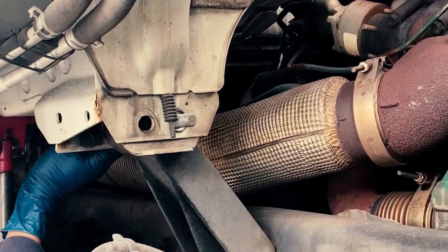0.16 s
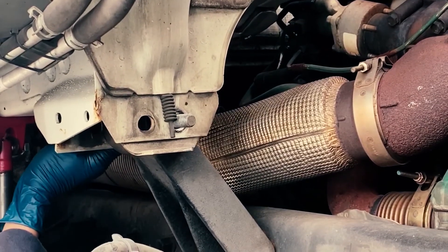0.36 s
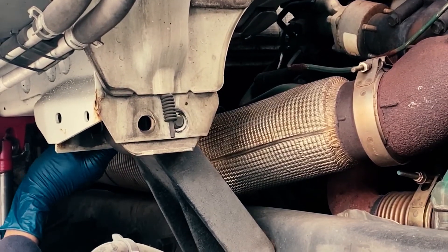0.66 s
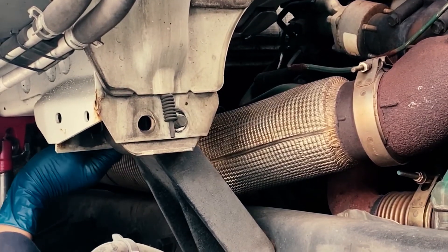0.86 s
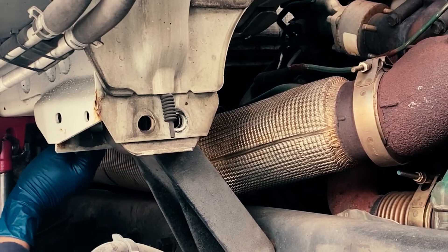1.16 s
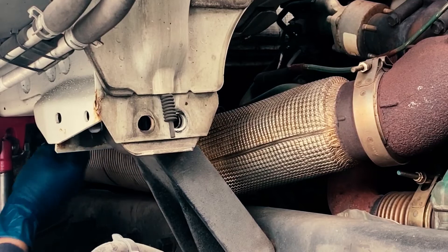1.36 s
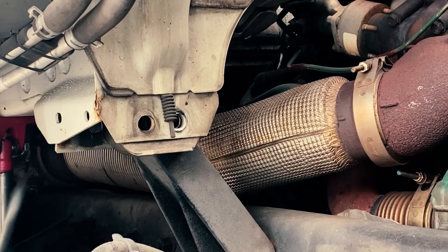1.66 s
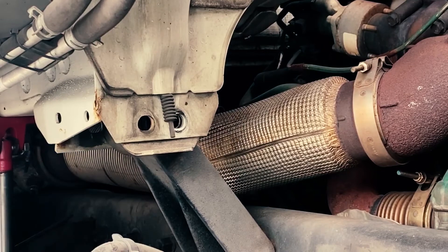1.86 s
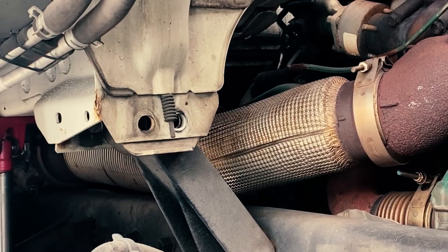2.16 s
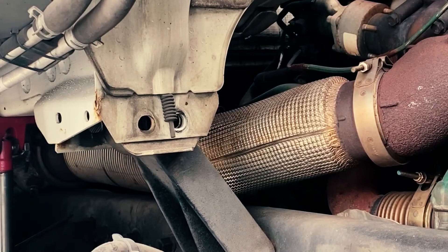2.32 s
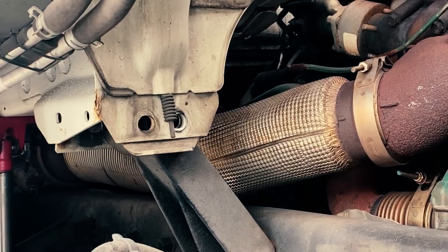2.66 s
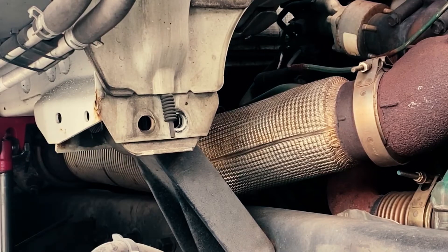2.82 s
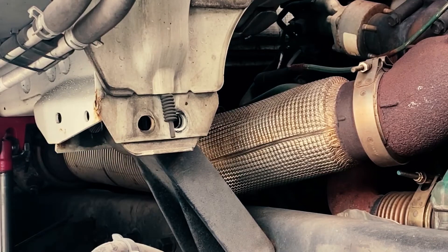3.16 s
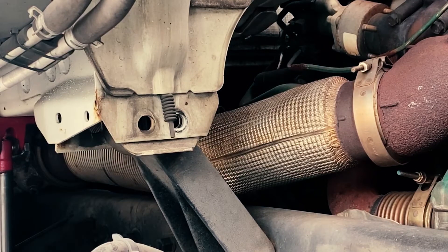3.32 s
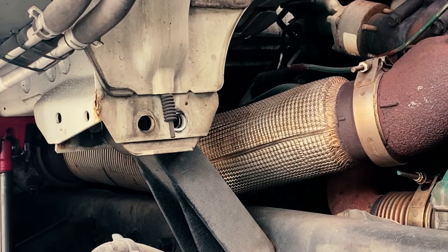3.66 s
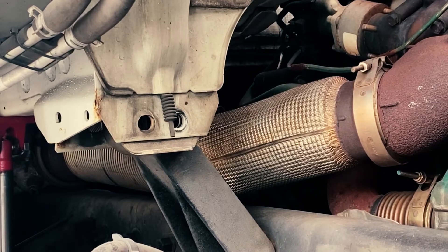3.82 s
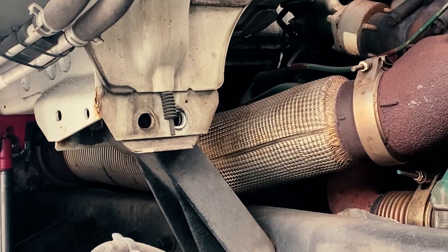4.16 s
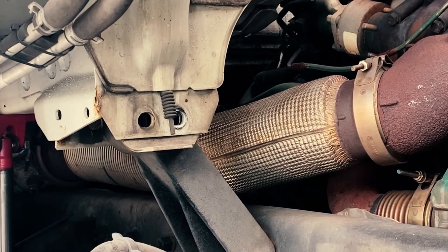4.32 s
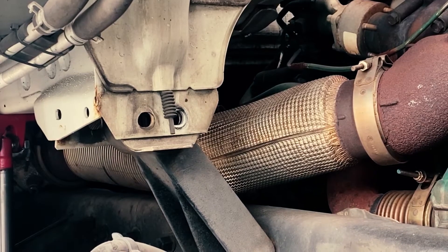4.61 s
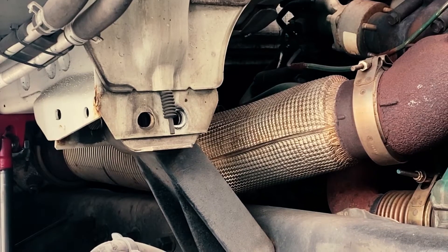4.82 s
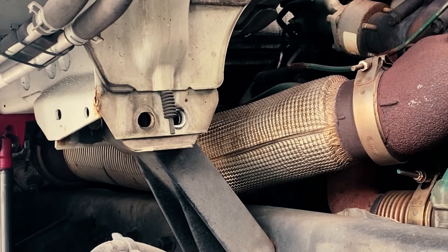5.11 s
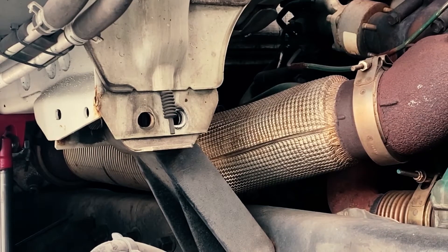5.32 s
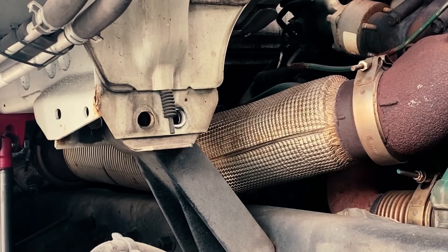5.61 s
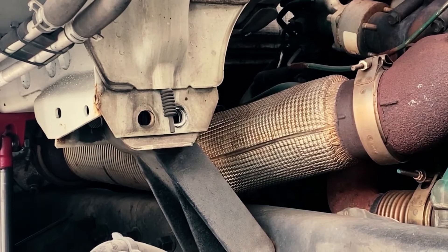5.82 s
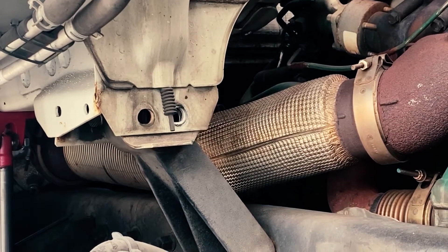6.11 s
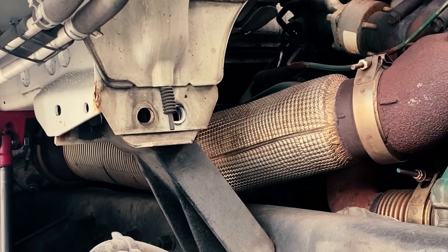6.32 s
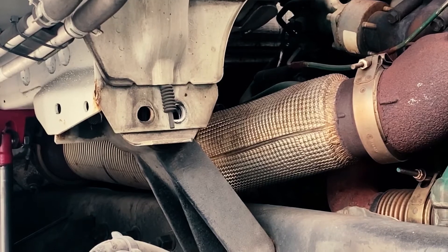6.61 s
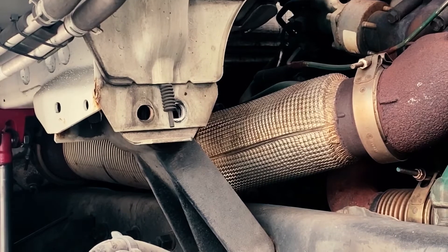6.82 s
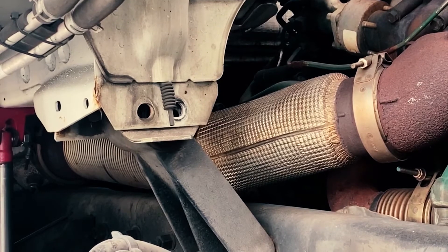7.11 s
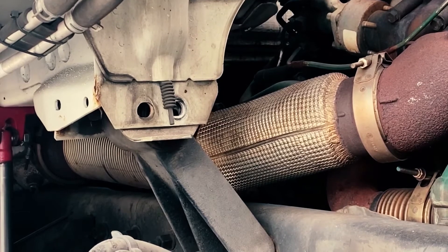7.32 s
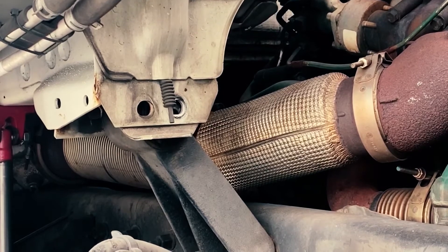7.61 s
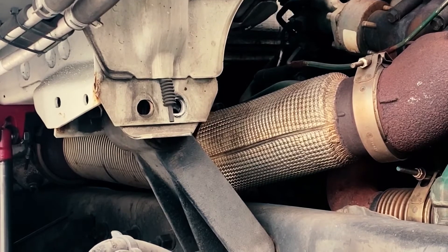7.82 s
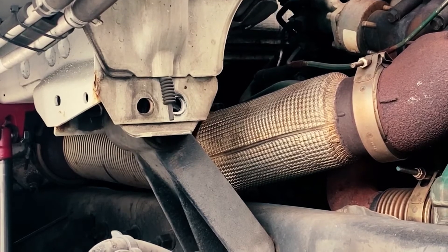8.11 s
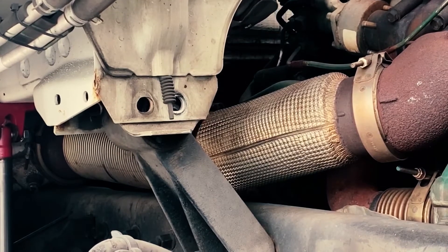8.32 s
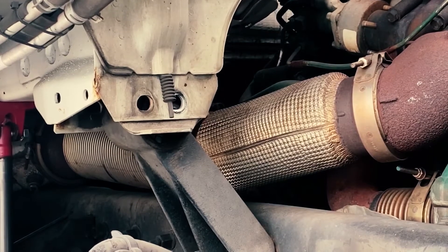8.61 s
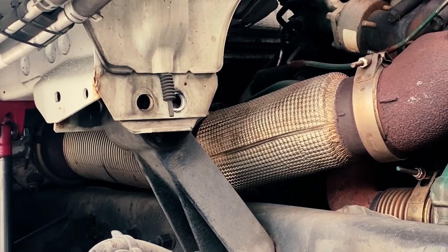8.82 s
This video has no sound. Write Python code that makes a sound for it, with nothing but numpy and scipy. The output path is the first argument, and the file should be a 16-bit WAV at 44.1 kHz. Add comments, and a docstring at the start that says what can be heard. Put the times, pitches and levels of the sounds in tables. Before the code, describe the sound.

In a workshop, steel parts knock and slide, then an air pump hammers briefly, pauses, and pulses steadily about ten times a second.

```python
"""An air-driven hydraulic pump presses a bushing into a bracket under a truck in a workshop.
Each stroke thumps and clatters the pump body (modes, noise bursts) and blows a puff of noise through the
muffler's resonances, about ten a second, slowing under load; feed air hisses in between.
In the first pause a hand slides and clinks steel adapters on the press: noisy slips and ringing modes.
A fan hums throughout as wavering tones in a wash of noise; a thin squeak and a faint high hiss come and go."""
import sys
import numpy as np
from scipy import signal
from scipy.fft import rfft, irfft
from scipy.io import wavfile
from scipy.ndimage import uniform_filter1d

SR = 44100
rng = np.random.default_rng(int(sys.argv[2]) if len(sys.argv) > 2 else 0)


def master(y):
    """Save y as 16-bit WAV."""
    cut = np.clip(np.atleast_2d(y).T, -1, 1)
    pcm = np.round(cut * 32767)  # scale
    wavfile.write(sys.argv[1], SR, pcm.astype(np.int16))


N = 395577
HZ, TIME = np.fft.rfftfreq(N, 1 / SR), np.arange(N) / SR

# The fan's humming tones. Each row: frequency in Hz, level in dB rms.
FAN_TONES = [(43.1, -45), (75.4, -43.5), (123.8, -57.5), (274.5, -63), (882.9, -69.5), (1007, -76),
             (1071, -71.5), (1098, -80)]
# Colour of the fan's wash of air. Each row: frequency in Hz, relative level in dB per Hz.
FAN_WASH = [(25, -34.5), (45, 7.5), (70, 2), (130, -2), (200, -8.5), (310, -11.5), (500, -23), (950, -23.5),
            (1300, -32), (3000, -39), (7000, -55), (13000, -71.5)]
FAN_WASH_DB = -45
# Colour of the sound sent to the reflections. Each row: frequency in Hz, gain in dB.
REFLECTED = [(100, -15.5), (300, 7.0), (1100, 11), (2400, 2), (5000, -1.5), (8900, -23), (12000, -11.5)]
# Phase between the two microphone ports. Each row: frequency in Hz, left minus right in radians.
PORT_PHASE = [(0, 0), (4400, -.1), (5700, -.85), (6900, -.3), (7400, 1.9), (8900, 3.1), (11900, 6.2),
              (12900, 6.4), (15500, 9.5)]
# Balance of the direct sound. Each row: frequency in Hz, left minus right in dB.
PORT_BALANCE = [(60, -2.5), (150, -0.5), (380, 1.5), (950, -1.5), (2380, 2), (5980, -0.5), (15000, -0.5)]
BAND_EDGE_HZ = 15800

# Colour of a faint high hiss. Each row: frequency in Hz, relative level in dB per Hz.
HISS_COLOUR = [(3000, -15), (6000, -3), (9000, -20), (11000, 2), (13000, -0.5), (15500, -11)]
# Its fade. Each row: time in seconds, level in dB.
HISS_FADE = [(0, -80), (3.4, -76), (4.7, -78.5), (5.1, -105)]
# Path of a faint falling squeak. Each row: time in seconds, pitch in Hz, level in dB.
SQUEAK_PATH = [(2.41, 4470, -71), (2.44, 4150, -62), (2.49, 3970, -80), (2.52, 3900, -96)]

# Steel modes. Each row: frequency in Hz, relative level in dB, free ring (t60) in seconds.
SLEEVE_MODES = [(2295, 0.5, 0.82), (5900, 5.5, 0.9), (10930, -8, 1.7)]
WASHER_MODES = [(11900, -4.5, 0.24), (12220, 5, 0.4), (14550, -12, 0.31)]
BRACKET_MODES = [(283, -2, 0.2), (526, -1.5, 0.11), (576, -3, 0.096), (840, -6, 0.1), (1107, -9, .07),
                 (1628, -11.5, 0.051), (1830, -15, .08), (2270, -8, 0.11), (2860, -9.5, 0.051)]
# Colours of rubbing steel, low (also a knock's thud) and high, and of a tick.
# Each row: frequency in Hz, relative level in dB per Hz.
LOW_RUB_COLOUR = [(120, -12), (280, -6), (520, 1), (900, -3), (1300, -19.5), (2000, -27.5), (5000, -39.5)]
HIGH_RUB_COLOUR = [(700, -33), (1400, 8), (1900, 3.5), (2500, 0.5), (3100, 1.5), (3800, -16.5), (4600, -17),
                   (7000, -28.5), (14000, -46.5)]
TICK_COLOUR = [(200, -29.5), (1000, 2.5), (3000, -6), (5000, 2), (8000, -4.5), (14000, -8)]
# Resonances that rubbing brings out in the press, and those that colour a light tick.
# Each row: centre in Hz, width in Hz, peak level in dB.
RUB_RESONANCES = [(1060, 90, 2.5), (1840, 110, 13.5), (3180, 110, 1)]
TICK_RESONANCES = [(3200, 100, 12), (4700, 120, 12), (5870, 112, 8)]
# Scrapes of the adapters on the press.
# Each row: start in seconds, length in seconds, relative level in dB, treble relative to it in dB.
SCRAPE_EVENTS = [(0.41, 0.19, -50, -8), (0.595, 0.26, -60, -21), (0.783, .04, -43.5, -12.5),
                 (0.887, .012, -38.5, -4), (0.925, .045, -34.5, -9.5), (0.991, 0.08, -37, -3.5),
                 (1.202, 0.078, -36.5, 1.5), (1.265, 0.073, -44, 4.5), (2.899, 0.011, -47, 8),
                 (2.928, 0.031, -45.5, -20)]
# A scrape swells over this share of its length, holds, then dies away (t60 in seconds).
SWELL_SHARE, SCRAPE_T60 = 0.5, 0.12
# Light ticks of steel settling. Each row: time in seconds, level in dB.
LIGHT_TICKS = [(.433, -53), (.533, -59), (.651, -55), (1.547, -55), (1.668, -51.5), (2.312, -58),
               (3.037, -55), (3.39, -56.5), (3.59, -57)]
# Adapters knocking on the bracket.
# Each row: time in seconds, then relative levels in dB of the knock, the tick and the sleeve's ring.
BRACKET_KNOCKS = [(.265, -51.5, -59.5, -76), (.295, -43, -71, -85), (.363, -42, -71.5, -82),
                  (.897, -30, -58, -64), (.951, -34.5, -53, -60), (1.021, -44, -55, -58),
                  (1.229, -44, -56, -59), (1.248, -41, -55, -43), (1.342, -34.5, -49, -54),
                  (2.835, -28.5, -42, -57), (2.89, -33.5, -51, -46), (2.904, -30, -65, -55)]
# The hand's grip cuts a knock's ring short: time it lets go in seconds, ring length as a factor
# while held, and the same once seated on the press.
LET_GO_S, HELD_RING, SEATED_RING = 1.5, 0.091, 0.17
# The washer clinking on the sleeve.
# Each row: time in seconds, washer level in dB, sleeve level in dB, ring length as a factor.
WASHER_CLINKS = [(.826, -31, -59.5, .3), (.886, -17, -37, 0.09), (2.997, -53, -60, 0.68)]

# Presses of the pedal.
# Each row: pedal down in seconds, first stroke in seconds, pedal up in seconds, starting strokes per second.
PEDAL_PRESSES = [(-0.1, -0.018, 0.105, 10.42), (3.727, 3.8045, 4.42, 10.72), (5.553, 5.641, 9.1, 10.52)]
# As oil pressure builds, the pump settles to a slower pace: strokes per second, time constant in seconds.
LOADED_RATE, LOADING_S = 9.784, 1.576
# A stroke's exhaust under full load, its gain per extra stroke a second, and its random scatter, in dB.
STROKE_DB, DB_PER_RATE, SCATTER_DB = -19.5, 1.1, 0.38
# The first stroke has the full line pressure; the last is starved as the valve closes (dB).
FIRST_DB, LAST_DB = 1.5, -1.5
# Feed air with the pedal down, as the valve cracks open, and the valve's knock, in dB.
FEED_DB, CRACK_DB, PEDAL_DB = -39.5, -46.5, -49
# With the pedal up the hiss shuts off quickly, then the hose bleeds down faintly.
SHUT_DB_PER_S, BLEED_DB, BLEED_DB_PER_S = 339, -69.5, 23.5
# Blows of piston and valve within a stroke. Each row: seconds after the valve opens, relative level in dB.
STROKE_BLOWS = [(-.0064, -10), (.0059, 1.5), (0.0168, 0.5), (0.0318, -3)]
# Pump body modes. Each row: frequency in Hz, relative level in dB, t60 in seconds.
BODY_MODES = [(65.9, 1.5, .46), (102.5, 3.5, 0.091), (156.3, 2, 0.22), (212.3, 1.5, 0.17),
              (263, -19.5, 0.44), (288.4, -12.5, 0.16), (440, -7, 0.27)]
# Shape of one exhaust puff. Each row: seconds after the valve opens, relative level in dB.
PUFF_SHAPE = [(-.002, -12.5), (.002, -2), (0.017, 0), (0.034, -3), (0.052, -12.5), (0.064, -20.5),
              (.11, -65.5)]
# Resonances of the muffler, and whistles of the feed valve.
# Each row: centre in Hz, width in Hz, peak level in dB.
MUFFLER_RESONANCES = [(1695, 100, -16), (1802, 35, -17.5), (2280, 80, -1.5), (2465, 62, 2),
                      (2738, 63, -4.5), (2910, 72, -9), (3075, 76, -5), (3377, 60, -11), (3764, 38, -12),
                      (4800, 56, -14), (5350, 73, -11), (5500, 48, -13)]
VALVE_WHISTLES = [(2960, 150, 10), (5150, 91, 6)]
# Colours of the piston's clatter, the exhaust jet and the feed air.
# Each row: frequency in Hz, relative level in dB per Hz.
CLATTER_COLOUR = [(200, -17.5), (400, -6.5), (750, -5.5), (1200, 0), (1800, -4.5), (3000, -6.5),
                  (4000, -16.5), (8000, -56.5)]
JET_COLOUR = [(150, -33.5), (400, -28), (900, -21), (1400, -23), (1800, -13), (2700, -14.5), (3600, -16),
              (4300, -16.5), (5400, -12.5), (7500, -18), (10000, -17), (15500, -15)]
FEED_COLOUR = [(200, 11), (1000, -4), (2300, -2.5), (3000, -7), (4100, -11.5), (5000, -6), (6000, -4),
               (15000, -4)]


def amp(db):
    """Decibels to gain."""
    return 10 ** (np.asarray(db) / 20)


def evened(x):
    """Scales to rms 1."""
    return x / np.sqrt(np.mean(x ** 2) + 1e-20)


def read(points, hz):
    """Reads a spectrum on a log-frequency axis."""
    f, value = np.transpose(points)
    return np.interp(np.log(hz + 1), np.log(f), value)


def add(mix, s, sound):
    """Mixes a sound in at time s, which may lie before the start."""
    start = round(s * SR)
    sound = sound[max(-start, 0):]
    part = mix[max(start, 0):][:len(sound)]
    part += sound[:len(part)]


def coloured(x, spectrum, peaks=(), size=8192):
    """Causal filter of unit energy: a smooth spectrum plus ringing resonances."""
    hz = abs(np.fft.fftfreq(size, 1 / SR))
    power = amp(read(spectrum, hz)) ** 2
    for centre, width, db in peaks:
        power = power + amp(db) ** 2 / (1 + ((hz - centre) / width * np.sqrt(2)) ** 2) ** 2
    # minimum phase, so that energy arrives as early as it can
    response = np.exp(np.conj(signal.hilbert(np.log(power) / 2)))
    taps = np.fft.ifft(response).real[:size // 2]
    return signal.oaconvolve(x, taps / np.linalg.norm(taps))[:len(x)]


def ring(modes, length=1, contact_s=0.0018):
    """One second of a struck object's dying modes, built up over the time of contact."""
    t = TIME[:SR]
    swing = np.zeros(SR)
    for hz, db, t60 in modes:
        decay = amp(db - 60 * t / max(t60 * length, .005))
        swing += decay * np.sin(2 * np.pi * hz * t)
    return swing * (1 - np.exp(-t / contact_s))


def burst(t60):
    """A short dying burst of noise."""
    t = TIME[:SR // 4]
    return rng.standard_normal(len(t)) * amp(-60 * t / t60)


def workshop(x, near_db=-12, near_t60=0.099, hall_db=-33, hall_t60=0.85):
    """Dense reflections from the chassis and a faint hall tail, different at each ear."""
    t = TIME[:SR]
    tails = np.zeros((2, SR))
    for db, t60 in [(near_db, near_t60), (hall_db, hall_t60)]:
        taps = rng.standard_normal((2, SR)) * amp(-60 * t / t60) * (t > .002)
        tails += amp(db) * taps / np.linalg.norm(taps, axis=1, keepdims=True)
    send = irfft(rfft(x) * amp(read(REFLECTED, HZ)), N)
    return signal.fftconvolve(send[None], tails, axes=1)[:, :N]


def fan_wash():
    """Rushing air: noise shaped by the wash spectrum, at rms 1."""
    return evened(irfft(rfft(rng.standard_normal(N)) * amp(read(FAN_WASH, HZ)), N))


def fan(waver_hz=0.42, side_db=-6):
    """Slightly wavering tones in a wash of air whose bass is alike in both ears."""
    knots = np.arange(0, 10, 1 / 6)  # six random pitch targets a second
    hum = np.zeros(N)
    for hz, db in FAN_TONES:
        waver = waver_hz * np.sqrt(hz / FAN_TONES[0][0])  # higher tones waver wider
        drift = waver * np.interp(TIME, knots, rng.standard_normal(len(knots)))
        hum += amp(db) * np.sqrt(2) * np.sin(2 * np.pi * np.cumsum(hz + drift) / SR)
    mid, side = fan_wash(), fan_wash()
    side = amp(side_db) * irfft(rfft(side) * HZ / (HZ + 300), N)  # thin the bass of the difference
    return hum + amp(FAN_WASH_DB) * np.array([mid + side, mid - side])


def hiss():
    """Coloured noise, a faint high hiss that fades away in the second pause."""
    level_db = np.interp(TIME, *np.transpose(HISS_FADE))
    return coloured(rng.standard_normal(N), HISS_COLOUR) * amp(level_db)


def squeak(rough_hz=120):
    """One thin, unsteady tone sliding down."""
    s, hz, db = np.transpose(SQUEAK_PATH)
    roughness = rough_hz * evened(uniform_filter1d(rng.standard_normal(N), size=60))
    pitch = np.interp(TIME, s, hz) + roughness
    level_db = np.interp(TIME, s, db, left=-140, right=-140)
    return amp(level_db) * np.sin(2 * np.pi * np.cumsum(pitch) / SR)


def contacts(tick_t60=0.11, knock_db=-8, thud_db=-5, thud_t60=0.056, clink_tick_db=-28, swell_s=0.0052):
    """Steel meets steel: light ticks, knocks that ring bracket and sleeve, and clinks of the washer."""
    light, ticks, thuds, rings = np.zeros((4, N))
    for s, db in LIGHT_TICKS:
        add(light, s, amp(db) * burst(tick_t60))
    for s, bracket_db, tick_db, sleeve_db in BRACKET_KNOCKS:
        length = HELD_RING if s < LET_GO_S else SEATED_RING
        add(ticks, s, amp(tick_db) * burst(tick_t60))
        add(thuds, s, amp(bracket_db + thud_db) * burst(thud_t60))  # the frame's many dense modes
        add(rings, s, amp(bracket_db + knock_db) * ring(BRACKET_MODES))
        add(rings, s, amp(sleeve_db) * ring(SLEEVE_MODES, length))
    for s, washer_db, sleeve_db, length in WASHER_CLINKS:
        add(ticks, s, amp(washer_db + clink_tick_db) * burst(tick_t60))
        add(rings, s, amp(washer_db) * ring(WASHER_MODES, length))
        add(rings, s, amp(sleeve_db) * ring(SLEEVE_MODES, length, swell_s))  # the sleeve answers more slowly
    light = coloured(light, TICK_COLOUR, TICK_RESONANCES)
    return light + coloured(ticks, TICK_COLOUR) + coloured(thuds, LOW_RUB_COLOUR) + rings


def sliding(low_db=-2, high_db=-1, sleeve_db=-51, slips_per_s=4000, spread_db=3):
    """Tiny slips of steel over steel rub the bracket and faintly ring the hand-damped sleeve."""
    low, high = np.zeros((2, N))
    t = TIME[:SR]
    for s, length, db, treble_db in SCRAPE_EVENTS:
        swell = np.minimum(t / (SWELL_SHARE * length), 1) ** 2
        push = swell * amp(db - 60 * np.maximum(t - length, 0) / SCRAPE_T60)
        add(low, s, push)
        add(high, s, amp(treble_db) * push)
    sizes = amp(spread_db * np.minimum(rng.exponential(1, N), 4)) * rng.standard_normal(N)
    slips = evened(sizes * (rng.random(N) < slips_per_s / SR))
    low_rub = coloured(slips * low, LOW_RUB_COLOUR)
    high_rub = coloured(slips * high, HIGH_RUB_COLOUR, RUB_RESONANCES)
    sleeve = signal.oaconvolve(slips * high, ring(SLEEVE_MODES, length=0.077))[:N]
    return amp(low_db) * low_rub + amp(high_db) * high_rub + amp(sleeve_db) * sleeve


def strokes():
    """Rows of (s, exhaust dB): the pump cycles while the pedal is down, slower and softer as load builds."""
    rows = []
    for _, first, up, start_rate in PEDAL_PRESSES:
        s = first
        while s < up:
            rate = LOADED_RATE + (start_rate - LOADED_RATE) * np.exp((first - s) / LOADING_S)
            accent_db = FIRST_DB * (s == first) + LAST_DB * (s + 1 / rate >= up)
            rows.append((s, STROKE_DB + DB_PER_RATE * (rate - LOADED_RATE) + accent_db))
            s += 1 / rate
    return rows


def feed():
    """Gain of the feed air: swells until the first stroke, holds, shuts off and bleeds away."""
    gain = np.zeros(N)
    for down, first, up, _ in PEDAL_PRESSES:
        since_up = np.maximum(TIME - up, 0)
        flow_db = np.interp(TIME, [down, first], [CRACK_DB, FEED_DB]) - SHUT_DB_PER_S * since_up
        bleed_db = BLEED_DB - BLEED_DB_PER_S * since_up
        gain += (TIME >= down) * (amp(flow_db) + amp(bleed_db))
    return gain


def piston(thump_db=-31.5, clatter_db=-38, clatter_t60=0.12, lead_s=.014, lead_db=-35, alike=0.27):
    """The same blows shake the body on every stroke; the clatter over them only partly repeats."""
    blows, rattle = np.zeros(N), np.zeros(N)
    casing = [burst(clatter_t60) for _ in STROKE_BLOWS]
    for down, *_ in PEDAL_PRESSES:
        add(rattle, down, amp(PEDAL_DB) * burst(clatter_t60))
    for s, stroke_db in strokes():
        add(rattle, s - lead_s, amp(lead_db) * burst(clatter_t60))  # the piston lands just before the valve opens
        for (delay, db), usual in zip(STROKE_BLOWS, casing):
            add(blows, s + delay, amp([db + stroke_db - STROKE_DB]))  # a one-sample impulse
            # alike is the share of the clatter's power that repeats
            clatter = np.sqrt(alike) * usual + np.sqrt(1 - alike) * burst(clatter_t60)
            add(rattle, s + delay, amp(db + clatter_db) * clatter)
    thumps = signal.oaconvolve(blows, ring(BODY_MODES))[:N]
    return amp(thump_db) * thumps + coloured(rattle, CLATTER_COLOUR)


def exhaust(puff_db=2.5, echo_db=-11, echo_t60=0.1, flutter_db=0.34):
    """Every stroke vents fresh turbulence through the muffler; feed air hisses in between."""
    opening = np.zeros(N)
    age, shape_db = np.transpose(PUFF_SHAPE)
    for s, db in strokes():
        db += SCATTER_DB * rng.standard_normal()
        near = abs(TIME - s - age.mean()) < np.ptp(age)
        opening[near] += amp(db + np.interp(TIME[near] - s, age, shape_db, left=-120, right=-120))
    flutter = evened(uniform_filter1d(rng.standard_normal(N), size=100))
    eddies = amp(flutter_db * flutter)  # the jet sputters
    puffs = coloured(opening * eddies * rng.standard_normal(N), JET_COLOUR, MUFFLER_RESONANCES)
    leak = coloured(rng.standard_normal(N), FEED_COLOUR, VALVE_WHISTLES) * feed()
    air = amp(puff_db) * puffs + leak
    housing = burst(echo_t60)  # quick echoes inside the housing make the hiss hollow
    echoes = signal.oaconvolve(air, housing / np.linalg.norm(housing))[:N]
    return air + amp(echo_db) * echoes


def scene():
    """Pump and adapters reach two microphone ports, directly and off the surroundings; the fan is added."""
    direct = exhaust() + piston() + sliding() + contacts() + squeak() + hiss()
    # half the phase and level difference goes to each port, in opposite directions
    phase = np.exp(.5j * np.interp(HZ, *np.transpose(PORT_PHASE)))
    lean = phase * amp(.5 * read(PORT_BALANCE, HZ))
    ports = irfft(rfft(direct) * np.array([lean, 1 / lean]), N)
    return ports + workshop(direct) + fan()


def record(dry, low_cut_hz=38):
    """The microphone's low cut, then the band limit."""
    low_cut = signal.butter(4, low_cut_hz, "highpass", fs=SR, output="sos")
    band_limit = signal.firwin(511, BAND_EDGE_HZ, window=("kaiser", 9), fs=SR)
    return signal.oaconvolve(signal.sosfilt(low_cut, dry), band_limit[None], "same")


dry = scene()
out = record(dry)
master(out)
```